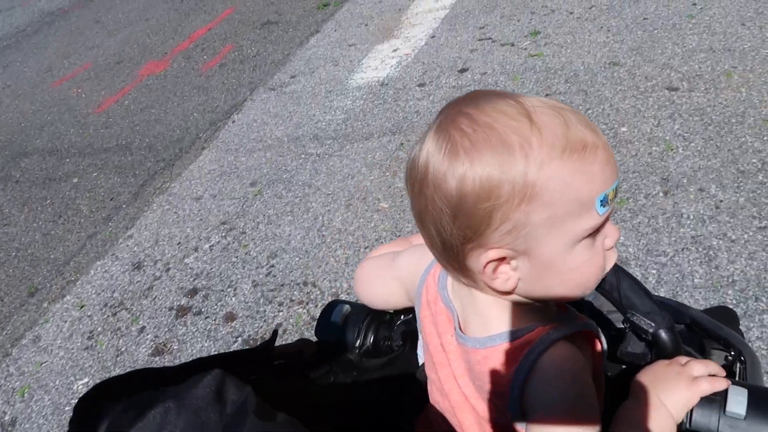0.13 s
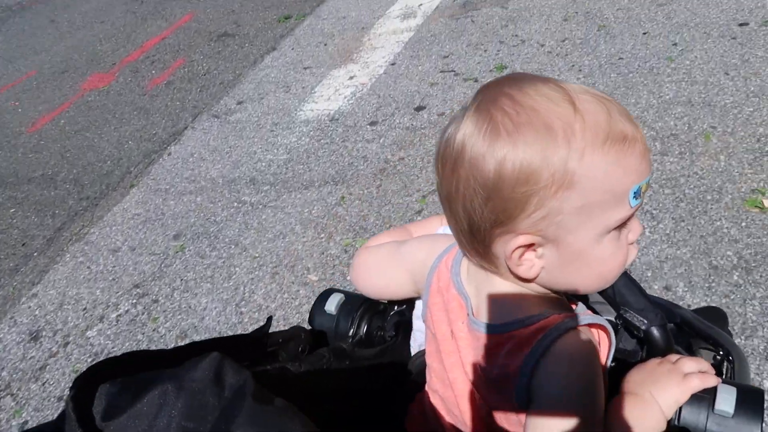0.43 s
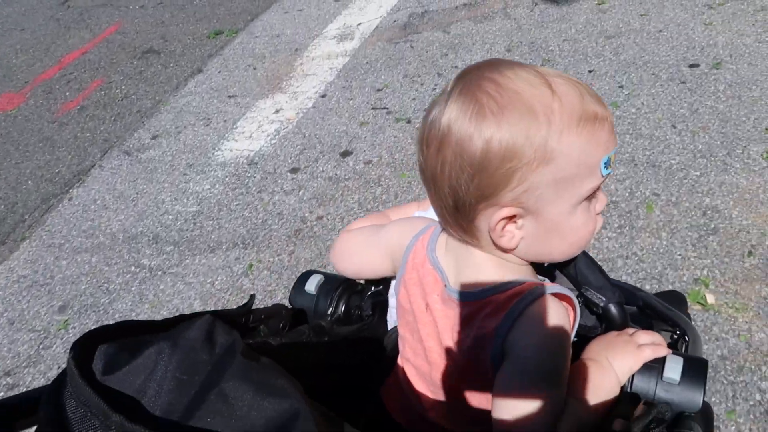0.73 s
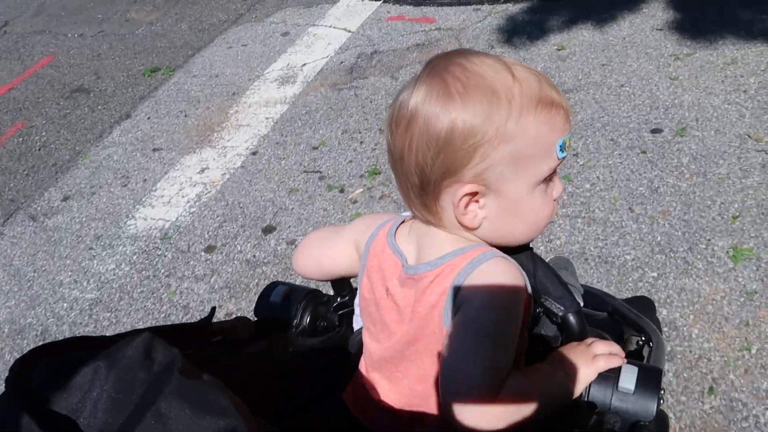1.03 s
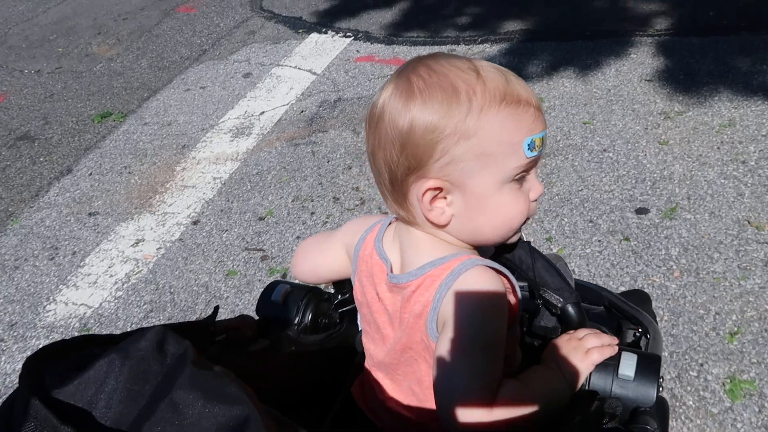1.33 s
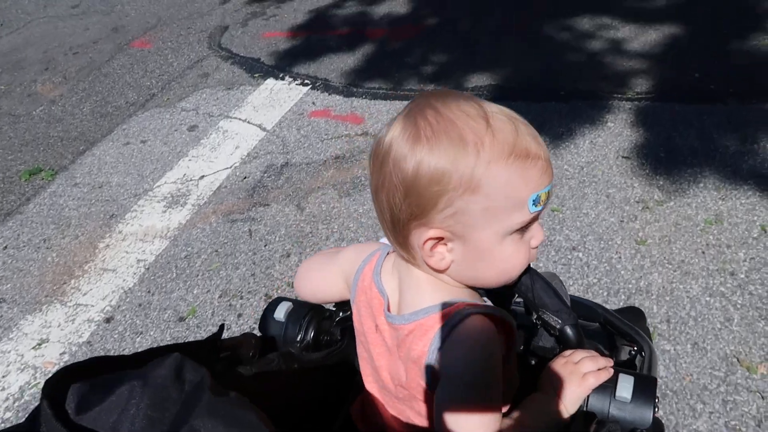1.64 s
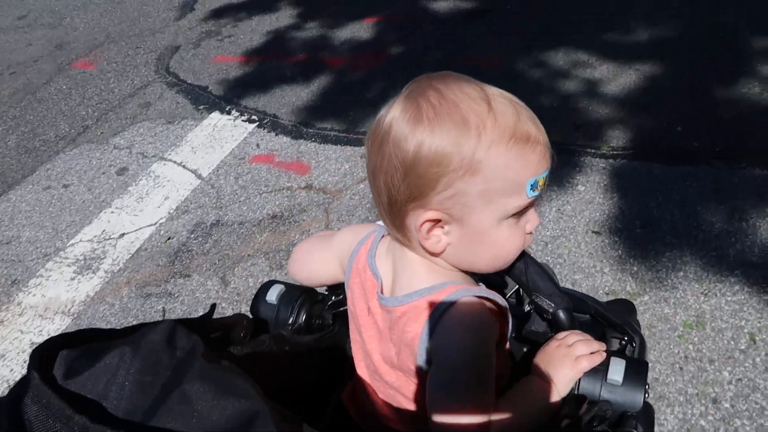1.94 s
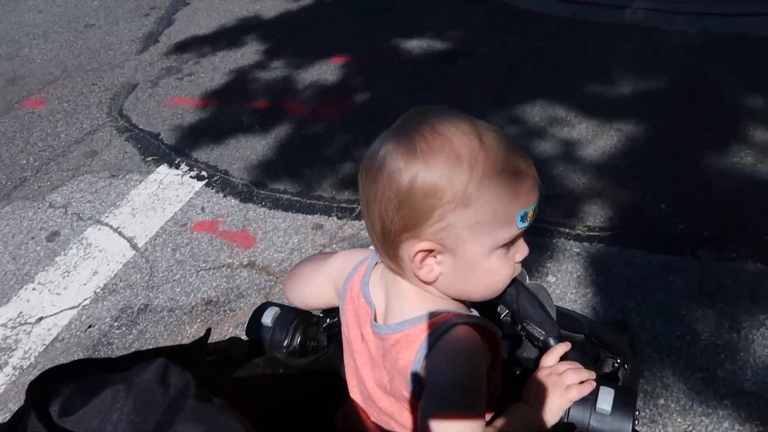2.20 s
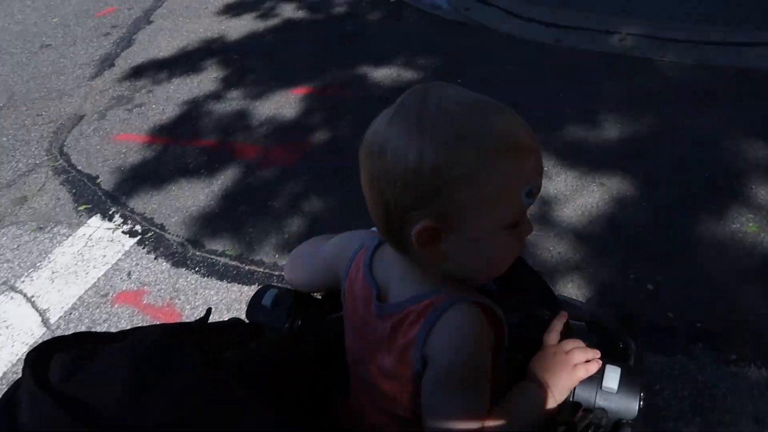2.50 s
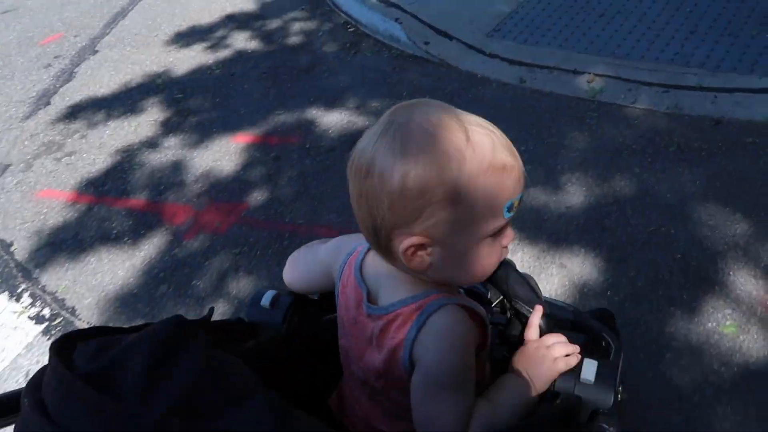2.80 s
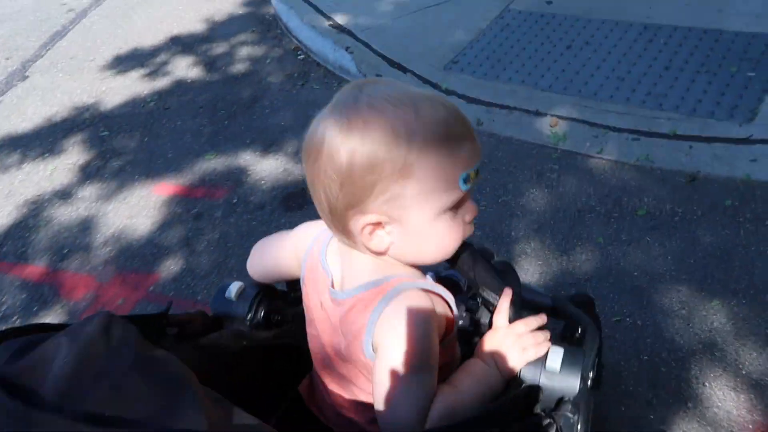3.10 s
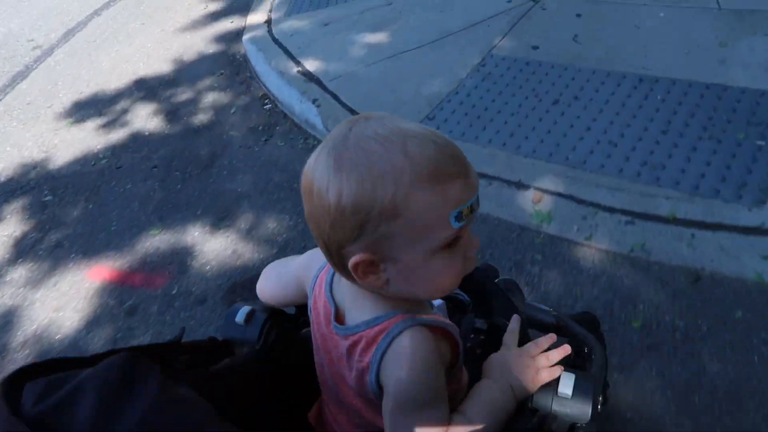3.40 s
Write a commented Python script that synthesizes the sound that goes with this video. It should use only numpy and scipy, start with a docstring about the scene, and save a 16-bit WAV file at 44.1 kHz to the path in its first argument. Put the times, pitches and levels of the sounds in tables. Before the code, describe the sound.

Stroller wheels rumble over coarse asphalt, jolt with a hard thud, then roll smoother with rattles

```python
"""A stroller's wheels drum on coarse asphalt, heard near its handle: coloured noise of tiny impacts.
A low drone of harmonics and the frame's modes sound along; after a bump the road gets smoother.
Knocks at listed times make the seat thud (damped sines), joints clatter (bursts of impacts) and
plastic parts clack (pairs of modes). A metal fitting rattles, sand ticks and joints squeak briefly."""
import sys
import numpy as np
from scipy import signal
from scipy.fft import rfft, irfft
from scipy.io import wavfile
from scipy.ndimage import uniform_filter1d, minimum_filter1d

SR = 44100
rng = np.random.default_rng(int(sys.argv[2]) if len(sys.argv) > 2 else 0)


def log_audio(samples):
    """Write samples as a 16-bit WAV file to the path given in sys.argv[1]."""
    # one column per channel
    frames = np.atleast_2d(samples).T
    # limit to full scale, then quantise
    limited = np.clip(frames, -1, 1)
    pcm = np.round(limited * 32767).astype(np.int16)
    wavfile.write(sys.argv[1], SR, pcm)


N = 156555
T = np.arange(N) / SR


def amp(db):
    """Decibels to gain."""
    return 10 ** (np.asarray(db) / 20)


def evened(x):
    """Scales to rms 1."""
    return x / np.sqrt(np.mean(x ** 2) + 1e-20)


def curve(table, axis):
    """One column of a time table, at every sample."""
    table = np.array(table)
    return np.interp(T, table[:, 0], table[:, axis])


def read(table, hz, axis=1):
    """One column of a frequency table, on a log axis."""
    table = np.array(table)
    return np.interp(np.log(hz + 1), np.log(table[:, 0] + 1), table[:, axis])


def colour(x, spectrum, size=4096):
    """Minimum-phase (causal) filter of unit energy with the given spectrum."""
    hz = abs(np.fft.fftfreq(size, 1 / SR))
    log_gain = np.log(amp(read(spectrum, hz)))
    response = np.exp(np.conj(signal.hilbert(log_gain)))
    taps = np.fft.ifft(response).real
    taps = taps / np.linalg.norm(taps)
    return signal.fftconvolve(x, taps[None], axes=1)[:, :N]


def wander(rate_hz):
    """Random motion of rms 1: noise with a Gaussian low-pass."""
    hz = np.fft.rfftfreq(N, 1 / SR)
    lowpass = np.exp(-(hz / rate_hz) ** 2)
    return evened(irfft(rfft(rng.standard_normal(N)) * lowpass, N))


def impacts(per_s, spread_db):
    """Tiny random impacts of uneven size and sign, two independent trains, scaled to rms 1."""
    size = amp(spread_db * np.minimum(rng.exponential(1, (2, N)), 4))
    sign = rng.choice([-1, 1], (2, N))
    hit = rng.random((2, N)) < per_s / SR
    return evened(size * sign * hit)


def burst(start_s, rise_s, fade_s):
    """Envelope with a straight rise and an exponential fall."""
    age = np.maximum(T - start_s, 0)
    rise = np.minimum(age / rise_s, 1)
    return rise * np.exp(-np.minimum(np.maximum(age - rise_s, 0) / fade_s, 20))


def add(mix, start_s, sound):
    """Adds a sound into the mix at a time."""
    part = mix[round(start_s * SR):][:len(sound)]
    part += sound[:len(part)]


# Decay of seat shell, basket and tubes. Each row: frequency in Hz, t60 in s.
BODY_DECAY = [(150, .14), (700, 0.48), (2500, 0.35), (4500, 0.4), (10000, 0.18)]


def body(x, wet_db):
    """Countless small resonances of the stroller add a short, dense tail: shaped noise, convolved."""
    hz, t, bins = signal.stft(rng.standard_normal((2, SR // 2)), SR, nperseg=256)
    decay = amp(-60 * t / read(BODY_DECAY, hz)[:, None])
    tail = signal.istft(bins * decay, SR, nperseg=256)[1]
    wet = evened(signal.fftconvolve(x, tail, axes=1)[:, :N])
    return (x + amp(wet_db) * np.std(x) * wet) / np.sqrt(1 + amp(wet_db) ** 2)


# Rolling levels. Each row: time in seconds, rumble in dB, road noise in dB, grit hiss in dB.
ROLL_LEVELS = [(0, -21, -21.5, -37.5), (.17, -18.5, -23.5, -42), (.55, -18.5, -23, -42.5),
               (.64, -19.5, -21.5, -38), (.8, -18, -22, -41.5), (1.24, -20, -22.5, -41.5),
               (1.3, -20, -21, -34), (1.56, -17, -21.5, -43), (1.66, -21, -22.5, -45),
               (1.76, -26.5, -28.5, -45.5), (2.05, -27.5, -28, -46), (2.36, -19, -24.5, -47),
               (2.5, -27.5, -26.5, -49), (2.66, -27.5, -29.5, -50), (2.84, -24, -27, -47),
               (2.94, -24, -24.5, -42), (3.25, -24, -27.5, -47.5), (3.55, -18.5, -27, -44)]
# Spectra of the rolling layers. Each row: frequency in Hz, relative density in dB per Hz.
RUMBLE_SPECTRUM = [(15, -25.5), (30, -17), (48, -7.5), (80, -0.5), (100, -4), (135, -4), (160, -1.5),
                   (200, -3.5), (290, 0), (350, -3.5), (450, -15), (700, -33), (1500, -62.5)]
ROAD_SPECTRUM = [(200, -19), (450, -5.5), (520, 1), (640, -1), (880, -3), (1120, -4), (1500, -8),
                 (1900, -10.5), (2500, -11), (3100, -19), (4000, -23.5), (6000, -30.5), (12000, -67)]
GRIT_SPECTRUM = [(1500, -20.5), (3500, 5), (5000, 1.5), (6500, 4), (8000, -5), (10000, -9), (12500, -12),
                 (14000, -19), (15500, -30)]


def rolling(shake_db=0.3, shake_hz=60, fizz_db=2.05):
    """Tyres drum on the stones: rumble of the seat, road noise and the hiss of grit."""
    shake = wander(shake_hz)
    stones = impacts(per_s=6000, spread_db=2.0) * amp(shake_db * shake)
    grit = impacts(per_s=12000, spread_db=1.0) * amp(fizz_db * shake)
    rumble = evened(body(colour(stones, RUMBLE_SPECTRUM), wet_db=-8))
    road = evened(body(colour(stones, ROAD_SPECTRUM), wet_db=-3.5))
    hiss = evened(body(colour(grit, GRIT_SPECTRUM), wet_db=-5))
    layers = enumerate([rumble, road, hiss], 1)
    return sum(layer * amp(curve(ROLL_LEVELS, column)) for column, layer in layers)


# Low drone of the wheels. Each row: time in seconds, pitch in Hz, level in dB.
DRONE_PATH = [(0, 64.16, -21), (.2, 63.93, -23.5), (.7, 64.36, -21.5), (.92, 63.92, -26), (1.2, 63.46, -22),
              (1.5, 63.59, -17), (1.68, 64.07, -29.5), (2.1, 62.92, -31), (2.22, 67, -32), (2.5, 66.4, -31),
              (2.95, 65, -31), (3.35, 62.4, -33), (3.46, 60.2, -24), (3.55, 59.7, -37.5)]
# Buzziness. Each row: time in seconds, gain of the overtones in dB.
OVERTONE_GAIN = [(0, -7), (.95, 0), (1.12, 1.5), (1.5, 1.5), (1.75, -0.5), (3.55, 1.5)]
# Relative strengths of the first three harmonics, in dB.
DRONE_HARMONICS_DB = [1, -6, -11]


def drone(waver_hz=1.26, throb_db=1.6, throb_rate_hz=14):
    """The wheels' low drone: three harmonics that throb and waver, with a changing buzz."""
    pitch_hz = curve(DRONE_PATH, axis=1) + waver_hz * wander(throb_rate_hz)
    turns = np.cumsum(pitch_hz) / SR
    buzz_db = curve(OVERTONE_GAIN, axis=1)
    tone = np.zeros(N)
    for k, db in enumerate(DRONE_HARMONICS_DB, 1):
        level_db = db + (k > 1) * buzz_db + throb_db * wander(throb_rate_hz)
        tone += amp(level_db) * np.sin(2 * np.pi * (k * turns + rng.random()))
    return evened(tone) * amp(curve(DRONE_PATH, axis=2))


# Modes of the frame. Each row: frequency in Hz, t60 in s, relative level in dB when rolling,
# relative level in dB when knocked.
FRAME_MODES = [(187.5, 0.42, -8.5, 4), (263.3, 0.19, -10.5, 5), (302.4, 0.19, -6.5, -10),
               (392.3, 0.2, -8.5, -3), (600, 0.083, -13.5, -10), (669.6, 0.18, -28, 6),
               (952, 0.42, -19, -8), (1078.4, .6, -13.5, -17.5), (1556, 0.29, -23.5, -13.5),
               (2346, 0.32, -28.5, -14)]
# Wheel knocks. Each row: start in seconds, thud in dB, thud pitch in Hz, thud swell in s,
# clatter in dB, snap in dB, frame ring in dB.
WHEEL_KNOCKS = [(1.573, -13.5, 249, .003, -15.5, -36, -30), (1.593, 0.5, 265, .0019, -21.5, -25.5, -28),
                (1.614, -15, 330, .004, -24.5, -38, -32), (1.954, -18.5, 250, .003, -20, -33, -50),
                (2.144, -17.5, 193, 0.0052, -23.5, -51, -36), (2.345, -16, 169, 0.0048, -16.5, -27, -35),
                (2.380, -14, 160, 0.0055, -19, -38.5, -35), (2.394, -12.5, 260, 0.0051, -14, -27, -29.5),
                (2.409, -9, 212, 0.0032, -23, -50, -21.5), (2.535, -14.5, 265, 0.0062, -26.5, -30, -38.5),
                (2.648, -25, 276, 0.004, -26, -46, -41), (2.743, -15, 303, 0.0055, -23.5, -32.5, -44),
                (2.760, -9, 317, 0.0048, -26.5, -41, -45), (2.866, -6, 168, 0.005, -21, -23, -27),
                (2.896, -20.5, 195, 0.0051, -20.5, -32.5, -34.5),
                (2.918, -13.5, 207, 0.0027, -24, -36, -47.5), (2.960, -16.5, 307, .006, -19.5, -36, -34.5),
                (3.079, -15, 290, 0.0045, -25.5, -38.5, -38), (3.150, -16, 276, 0.0026, -23, -39, -40),
                (3.387, -17, 191, 0.0072, -15.5, -45, -30), (3.428, -17, 230, 0.0015, -25.5, -54, -40),
                (3.446, -14, 151, 0.0035, -24.5, -46, -38), (3.502, -13, 261, .005, -28, -50, -36)]
KNOCK_RISE_S = 0.004  # of frame ring and clatter


def frame():
    """The frame's modes sing under the road's vibration and ring after each knock."""
    t, out = T[:SR // 2], np.zeros(N)
    road = amp(curve(ROLL_LEVELS, axis=2))
    rise = np.minimum(t / KNOCK_RISE_S, 1)
    for hz, t60_s, roll_db, knock_db in FRAME_MODES:
        mode = amp(-60 * t / t60_s) * np.exp(2j * np.pi * hz * t)
        singing = evened(signal.fftconvolve(rng.standard_normal(N), mode.real)[:N])
        out += amp(roll_db) * road * singing
        for start_s, *_, ring_db in WHEEL_KNOCKS:
            ring = (mode * np.exp(2j * np.pi * rng.random())).real
            add(out, start_s, amp(ring_db + knock_db) * rise * ring)
    return out


def thuds():
    """Each knock gives the seat a few heavily damped swings."""
    t, out = T[:SR // 8], np.zeros(N)
    for start_s, db, hz, swell_s, *_ in WHEEL_KNOCKS:
        swell = t / swell_s * np.exp(1 - t / swell_s)
        add(out, start_s, amp(db) * swell * np.sin(2 * np.pi * hz * t))
    return out


# Spectra of the loose joints. Each row: frequency in Hz, relative density in dB per Hz.
CLATTER_SPECTRUM = [(80, -10.5), (200, 3), (450, -4), (700, 1.5), (1150, -1), (1600, -5.5), (2200, -11.5),
                    (3000, -25), (5000, -35.5), (12000, -63)]
SNAP_SPECTRUM = [(800, -17.5), (2000, -2.5), (2900, 2), (3400, 2), (3900, -3.5), (4600, -10.5),
                 (6000, -17.5), (9000, -33), (13000, -42.5), (15500, -59.5)]


def joints():
    """Loose plastic joints chatter after each knock: a dull clatter and a bright snap."""
    clatter, snap = np.zeros(N), np.zeros(N)
    for start_s, _, _, _, clatter_db, snap_db, _ in WHEEL_KNOCKS:
        clatter += amp(clatter_db) * burst(start_s, KNOCK_RISE_S, fade_s=0.023)
        snap += amp(snap_db) * burst(start_s, rise_s=0.006, fade_s=0.025)
    dull = colour(clatter * impacts(per_s=4000, spread_db=-1.0), CLATTER_SPECTRUM)
    bright = colour(snap * impacts(per_s=4000, spread_db=0.0), SNAP_SPECTRUM)
    return body(dull, wet_db=-8.5) + body(bright, wet_db=-6)


# Ringing plastic parts. Each row: start in seconds, pitch in Hz, level in dB, t60 in s.
PLASTIC_CLACKS = [(1.593, 3380, -19.5, 0.089), (1.603, 1340, -18.5, .13), (2.397, 2260, -22, .34),
                  (2.409, 1068, -20.5, .38), (2.755, 1322, -20, 0.093), (2.869, 2300, -20, .11),
                  (2.882, 686, -16, 0.19), (2.960, 1340, -24.5, .16), (3.392, 705, -20, 0.29)]


def clacks(rise_s=.0045, partner_ratio=.89, partner_db=-5):
    """Each loose plastic part rings briefly with two neighbouring modes."""
    t, out = T[:SR // 3], np.zeros(N)
    for start_s, hz, db, t60_s in PLASTIC_CLACKS:
        partner = np.sin(2 * np.pi * (partner_ratio * hz * t + rng.random()))
        pair = np.sin(2 * np.pi * hz * t) + amp(partner_db) * partner
        add(out, start_s, amp(db - 60 * t / t60_s) * np.minimum(t / rise_s, 1) * pair)
    return out


# Rattles of a metal fitting, at hard jolts. Each row: start in seconds, level in dB,
# fade of the rattle in s.
FITTING_RATTLES = [(1.594, -50, .04), (2.41, -52, .09), (2.871, -41.5, 0.23)]
# Modes of the fitting. Each row: frequency in Hz, relative level in dB, t60 in s.
FITTING_MODES = [(2100, -3, .25), (2300, 1.5, .35), (2800, -5, 0.25), (3480, 1, 0.6), (3650, -4, 0.45),
                 (4480, -1.5, .55)]


def clinks(gap_s=.021, uneven_db=2.5, rebound_db=-2, tick_db=9, tick_fade_s=.002, detune=.003, count=13):
    """The loose fitting bounces unevenly and dies away; each contact ticks and renews its ring."""
    t, ring, ticks = T[:SR // 2], np.zeros(N), np.zeros(N)
    tick_fade = np.exp(-np.minimum(t / tick_fade_s, 20))
    for start_s, db, fade_s in FITTING_RATTLES:
        gaps = gap_s * (.5 + rng.random(count))
        for age in np.cumsum(gaps) - gaps[0]:
            bounce_db = (age > 0) * (rebound_db + uneven_db * rng.uniform(-0.92, 1))
            force = amp(db + bounce_db) * np.exp(-age / fade_s)
            pitch = 1 + detune * rng.uniform(-1, 1)
            modes = np.zeros(len(t))
            for hz, mode_db, t60_s in FITTING_MODES:
                swing = np.sin(2 * np.pi * (pitch * hz * t + rng.random()))
                modes += amp(mode_db - 60 * t / t60_s) * swing
            add(ring, start_s + age, force * modes)
            add(ticks, start_s + age, force * tick_fade * rng.standard_normal(len(t)))
    return ring + amp(tick_db) * colour(ticks[None], SNAP_SPECTRUM)[0]


# Grains of sand cracking under a tyre. Each row: start in seconds, level in dB.
SAND_CRACKS = [(1.93, -42), (1.99, -36), (2.097, -39), (2.16, -40), (2.184, -40.5), (2.515, -41),
               (3.267, -38)]
# Spectrum of a crack. Each row: frequency in Hz, relative density in dB per Hz.
CRACK_SPECTRUM = [(2000, -21), (6000, 4), (9000, -3.5), (13000, 0.5), (15500, -8)]


def sand():
    """Single grains crack with a thin tick: a very short burst of noise."""
    level = sum(amp(db) * burst(start_s, rise_s=.0003, fade_s=.0012) for start_s, db in SAND_CRACKS)
    return colour(level * rng.standard_normal((2, N)), CRACK_SPECTRUM)


# Squeaks of the joints. Each row: start in seconds, length in s, top pitch in Hz, level in dB.
JOINT_SQUEAKS = [(2.335, 0.021, 3150, -29), (2.338, 0.074, 4270, -30.5), (3.180, 0.04, 4540, -37)]


def squeaks(arch_depth=.055, jitter=.018, jitter_rate_hz=700, right_db=-3, lag_rad=1.65):
    """Joints slip under load with short, rough whistles whose pitch arches; the right side lags."""
    out = np.zeros((2, N))
    for start_s, length_s, hz, db in JOINT_SQUEAKS:
        arch = np.sin(np.pi * np.clip((T - start_s) / length_s, 0, 1))
        pitch_hz = hz * (1 - arch_depth * (1 - arch) + jitter * wander(jitter_rate_hz))
        angle = 2 * np.pi * np.cumsum(pitch_hz) / SR
        sides = np.array([np.sin(angle), amp(right_db) * np.sin(angle - lag_rad)])
        out += amp(db) * arch * sides
    return out


# Stereo likeness, lag and level by frequency. Each row: frequency in Hz, likeness of the sides
# (0 to 1), left lag in rad, left level in dB.
STEREO_IMAGE = [(150, 1, 0, 0), (320, 1, 0, -0.87), (550, 0.99, 0, -2.5), (1100, 0.99, -0.6, -4),
                (2000, 0.8, .5, -3.5), (3050, 0.53, 0.6, -2), (4730, 0.47, 1.72, -3), (7180, 0.76, 3.5, 0)]
# Last row of the stereo image, same columns.
STEREO_LAST_ROW = (8500, 1, np.pi, 0)


def stereo(spread, centred):
    """The left side departs from the right in likeness, phase and level, by frequency."""
    hz, image = np.fft.rfftfreq(N, 1 / SR), STEREO_IMAGE + [STEREO_LAST_ROW]
    (a, b), c = rfft(spread), rfft(centred)
    same = np.clip(read(image, hz, axis=1), -1, 1)
    left = same * a + np.sqrt(1 - same ** 2) * b + c
    left = left * np.exp(-1j * read(image, hz, axis=2)) * amp(read(image, hz, axis=3))
    return irfft(np.array([left, a + c]), N)


def scene():
    """The whole stroller; the squeaks carry their own stereo offset."""
    spread = rolling() + joints() + sand()
    centred = drone() + frame() + thuds() + clacks() + clinks()
    return stereo(spread, centred) + squeaks()


def record(dry, edge_hz=14600):
    """A quick look-ahead limiter holds peaks to 0.96 of full scale; then a low-pass."""
    headroom = np.minimum(1, .96 / (abs(dry).max(0) + 1e-9))
    held = minimum_filter1d(headroom, size=201)
    gain = uniform_filter1d(uniform_filter1d(held, size=101), size=101)
    lowpass = signal.firwin(255, edge_hz, window=("kaiser", 9), fs=SR)
    return signal.oaconvolve(dry * gain, lowpass[None], "same")


dry = scene()
out = record(dry)
log_audio(out)
```